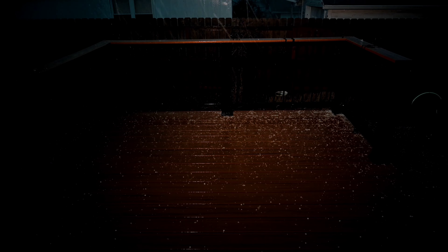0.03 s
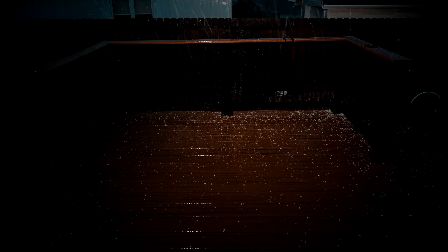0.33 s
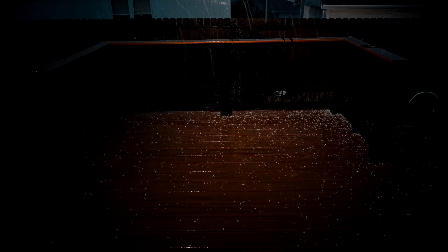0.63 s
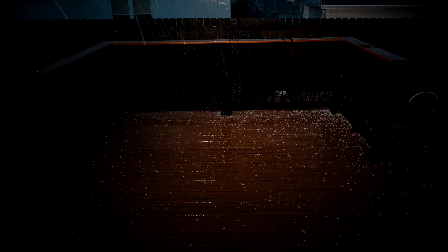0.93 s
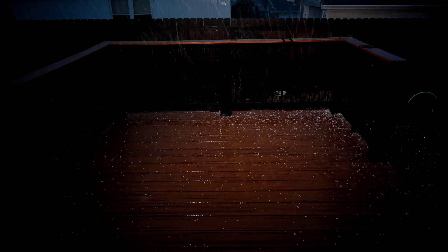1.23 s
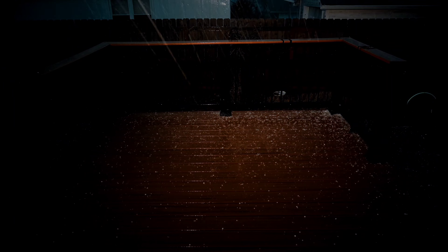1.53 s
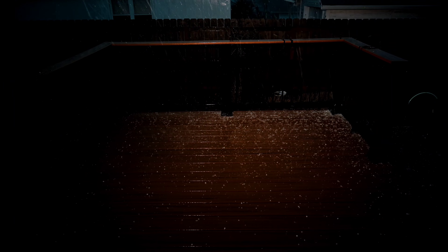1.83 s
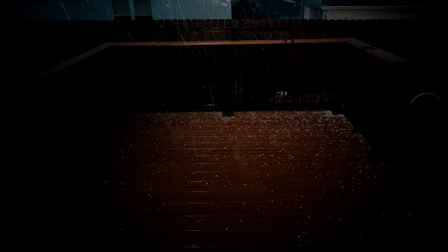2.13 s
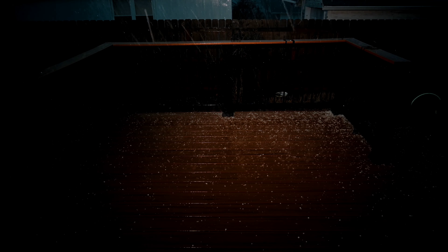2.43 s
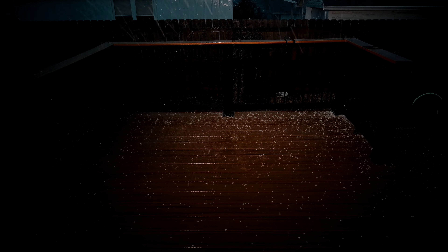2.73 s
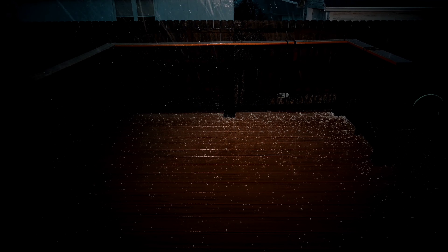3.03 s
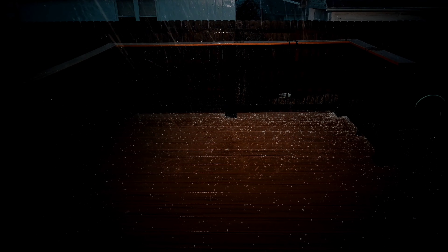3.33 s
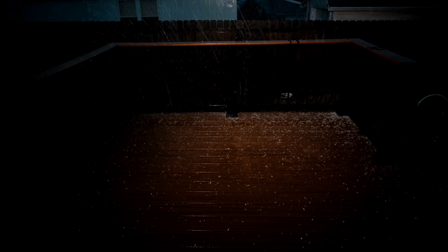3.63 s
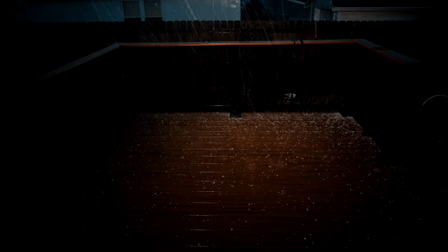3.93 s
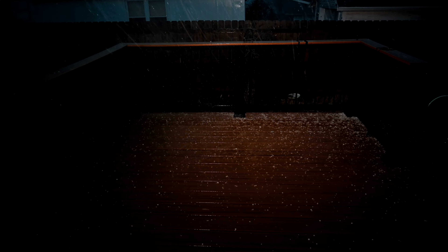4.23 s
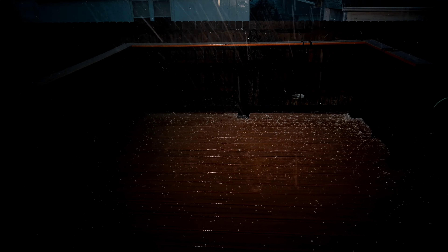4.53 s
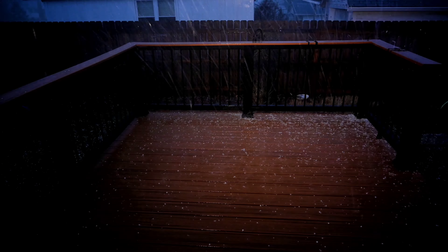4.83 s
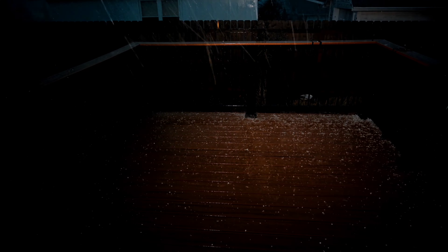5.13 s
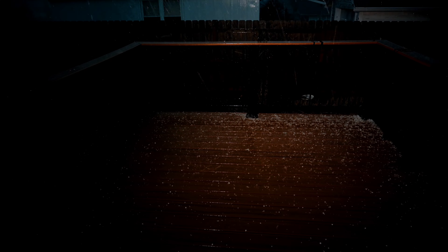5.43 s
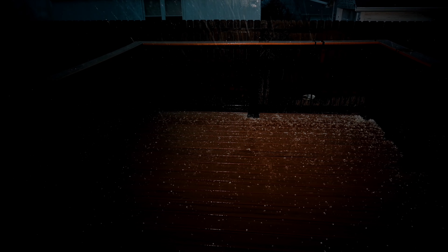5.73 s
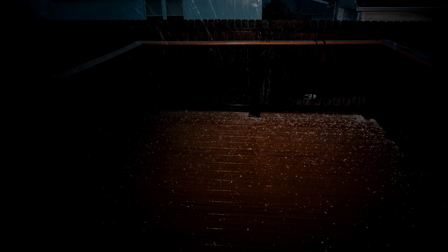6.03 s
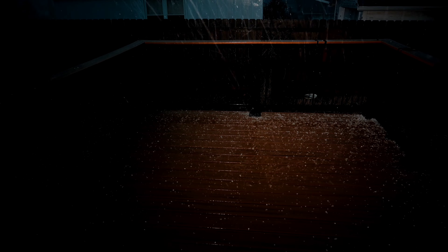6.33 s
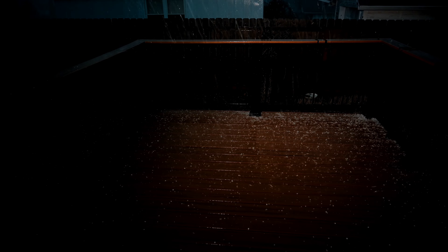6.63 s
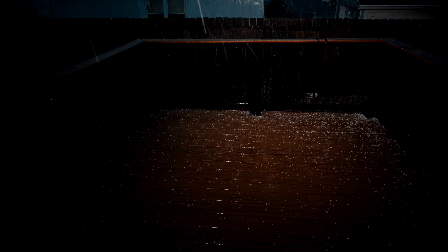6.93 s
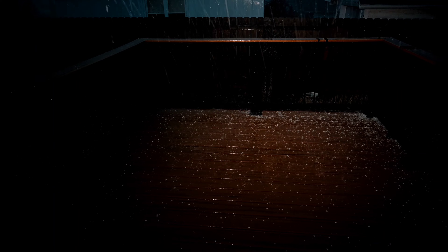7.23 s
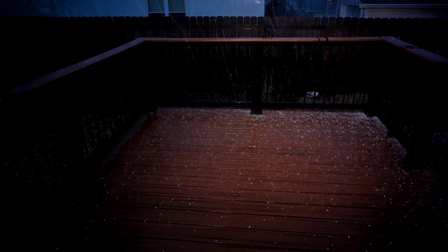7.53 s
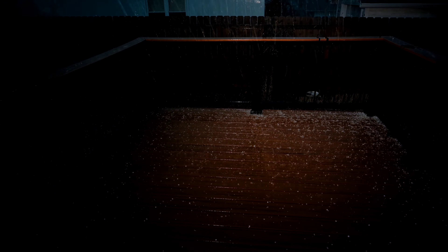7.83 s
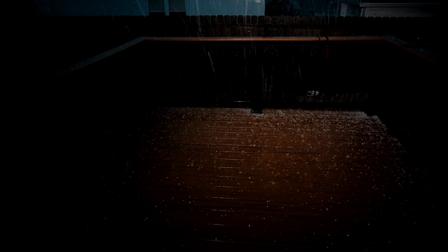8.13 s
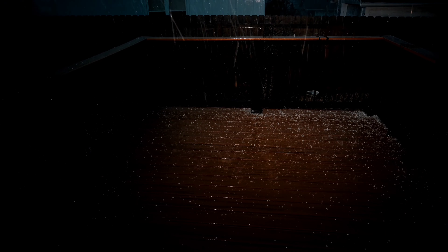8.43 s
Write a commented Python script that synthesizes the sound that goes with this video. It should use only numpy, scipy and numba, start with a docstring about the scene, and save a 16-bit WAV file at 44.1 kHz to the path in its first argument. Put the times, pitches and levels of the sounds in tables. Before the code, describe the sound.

Heavy rain falls steadily on a wooden deck outdoors, heard from shelter. A broad hiss of distant drops lies under close ticking, splashing and pattering on wet boards, with faint pings on metal. Fat drips splat and heavier ones thud softly on the deck. Every so often a hard drop or small hailstone snaps sharply near the microphone, and the shower dips for an instant.

```python
"""Heavy rain on a wooden deck at night, heard from shelter, nearly mono.
Countless far drops make a wash; near drops tick, splash, ring bubbles, drum the boards and ping on metal.
Fat drips splat on wet wood, heavy ones thud on the deck; air faintly bumps the microphone.
Now and then a hard drop or hailstone snaps close by and a limiter ducks the whole shower."""
import sys
import numpy as np
from scipy import signal
from scipy.fft import rfft, irfft, next_fast_len
from scipy.io import wavfile
from scipy.ndimage import uniform_filter1d
from numba import njit

SR = 44100
rng = np.random.default_rng(int(sys.argv[2]) if len(sys.argv) > 2 else 0)


def generate_wav(sig):
    """Save sig (samples, or channels by samples) to the path in sys.argv[1] as 16-bit PCM at SR."""
    pcm = np.round(np.clip(np.atleast_2d(sig).T, -1, 1) * 32767).astype(np.int16)
    wavfile.write(sys.argv[1], SR, pcm)


N = 373527

# Layer gains as the shower varies: time_s, boards_db, spray_db, metal_db, body_db
SHOWER_GAINS = [(0, .5, -1, 0, 0), (.5, 2, -1.5, 1, 4.5), (1.0, -.5, 1, 3, -8), (1.45, 1.5, 1, -6, 5.5),
                (1.7, -3.5, -1, -4, -7), (2.1, -0.5, 0, 6, 1), (2.95, 1.5, -1, -21, 6),
                (3.5, -1.5, -1.5, 0, 4), (3.75, 3.5, 1.7, 0, 5.5), (4.2, -3.5, 0, -5, 3.5),
                (4.7, -2, 0, 7, 1), (5.6, -6, 2.4, -9, -4), (6.2, 0, -0.2, 1, -6.5),
                (6.7, -10, 0.5, 4, -0.5), (7.15, -2.5, -1.5, 2, -10.5), (7.8, -0.5, 0.5, 1, 1.5),
                (8.45, -6, -0.5, 4, -2.5)]
# Rain tone at the microphone: freq_hz, relative_db
RAIN_EQ = [(25, -69), (65, -31.5), (115, -23), (165, -11.5), (270, -5.5), (390, -5), (550, -2.5),
           (850, 0.63), (1250, -0.57), (2250, 0.26), (3200, 0.1), (4550, -0.24), (5150, -5.5), (6800, -4),
           (8050, -2), (9600, -8), (11500, -10.3), (13000, -8), (14400, -15.5)]
# Stereo width: freq_hz, side_minus_mid_db
SIDE_EQ = [(60, -17), (250, -40.5), (1000, -53.5), (3800, -56.5), (5500, -37), (8000, -14.5),
           (14000, -11.5)]
# Wet metal resonances: pitch_hz, relative_db
METAL_MODES = [(4420, -18), (8080, -22)]
# Hard drops close by: peak_s, level_db, pitch_hz
HARD_DROPS = [(0.5628, -3.5, 5000), (0.9636, 0, 3500), (1.1205, 0.5, 4000), (1.2955, 4, 3980),
              (1.582, 5.5, 3250), (1.8454, 1, 4000), (2.2054, 3, 5000), (2.2799, 3.5, 17000),
              (2.446, 3.5, 4500), (2.7636, 5.7, 4340), (3.09, 0.7, 4000), (3.16, -2.5, 17000),
              (3.2669, 2, 12000), (3.854, 2.5, 4000), (3.878, 6.5, 14200), (4.2003, 0.5, 5000),
              (4.413, 0, 7000), (4.9001, 2.3, 7000), (5.294, -3, 6000), (5.6208, -1, 3500),
              (5.7696, -3, 4000), (5.9956, 0, 5000), (6.7464, 6.5, 3200), (7.0602, -3, 4500),
              (7.089, 4, 4000), (7.4452, 0.5, 6000), (7.5829, 6.5, 3800), (7.8152, 4, 4500),
              (8.4359, 7, 4630)]
# Fat drips on wet wood: peak_s, level_db, centre_hz, half_length_s
FAT_DRIPS = [(.452, -25, 9000, .003), (.652, -29, 11500, 0.0034), (.704, -18, 3470, 0.0033),
             (.773, -22, 7000, .003), (1.049, -21, 3800, .003), (2.203, -21, 7500, .003),
             (3.267, -24, 11000, .003), (3.519, -21, 8000, .003), (3.805, -27, 3600, .006),
             (4.745, -24, 8000, .006), (5.09, -19, 3800, .003), (5.433, -19, 3800, .003),
             (5.514, -19, 13100, 0.0037), (5.618, -16, 3680, 0.0044), (5.727, -17, 3760, 0.003),
             (5.765, -19, 3620, 0.0074), (5.854, -21, 3400, 0.0063), (6.485, -20, 3700, 0.0037),
             (6.705, -21, 3780, 0.0028), (6.744, -19, 3500, .003), (7.058, -20, 3700, .003)]
# Heavy drips on the deck: peak_s, level_db, pitch_hz
HEAVY_DRIPS = [(0.211, -41, 119), (0.398, -37.5, 113), (1.487, -36, 106), (2.745, -46, 108),
               (3.07, -41, 109), (3.407, -41, 118), (3.51, -38, 98), (3.658, -40, 114), (3.779, -39, 132),
               (4.149, -40.5, 112), (4.404, -43, 127), (4.604, -49, 117), (5.007, -39, 124),
               (5.135, -42, 120), (5.231, -44, 105), (5.312, -47, 116), (5.442, -43, 128),
               (5.794, -42.5, 121), (6.305, -44, 121), (6.498, -46, 129), (6.665, -44, 82),
               (6.745, -39, 99), (7.543, -44, 130), (7.789, -47, 116), (8.017, -41, 108), (8.284, -37, 105)]
# Air on the microphone: start_s, level_db, pitch_hz
AIR_BUMPS = [(1.895, -45, 52), (2.755, -41, 30), (4.895, -50, 40)]


def rain(boards_db, spray_db, metal_db, body_db):
    """Far and near drops, each layer at its own gain; the treble flickers."""
    far = wash()
    fine = spray()
    boards = drumming() * undb(boards_db)
    body = deck_body() * undb(body_db)
    metal = pings() * undb(metal_db)
    fine *= undb(spray_db + 0.8 * wander(rate_hz=22))
    return equalise(far + fine + boards + metal + body, RAIN_EQ)


def wash():
    """Countless far drops merge into noise."""
    return set_rms(rng.standard_normal(N), 0.2) * undb(0.41 * wander(rate_hz=15))


def spray():
    """Near drops tick, big ones burst into droplets, trapped air rings in the puddles."""
    ticks = drops(per_s=3800, lo_hz=1600, hi_hz=15100, cycles=2.38, spread_db=3.5)
    burst_envelope = np.abs(drops(per_s=100, lo_hz=87, hi_hz=217, cycles=5.5, spread_db=3))
    splashes = bandpass(burst_envelope * rng.standard_normal(N), 3700, 22000)
    bubbles = drops(per_s=700, lo_hz=3500, hi_hz=14500, cycles=190, spread_db=4.4, glide=.02)
    return set_rms(ticks, -0.98) + set_rms(splashes, -6) + set_rms(bubbles, -7)


def drumming():
    """Wet boards and nearby things answer each drop with a short pitched knock."""
    patter = drops(per_s=950, lo_hz=1000, hi_hz=4800, cycles=65, spread_db=3.9)
    wood = drops(per_s=260, lo_hz=427, hi_hz=1103, cycles=55, spread_db=2)
    return set_rms(patter, -8.5) + set_rms(wood, -13)


def deck_body():
    """Drops ring the deck's low body."""
    return set_rms(drops(per_s=110, lo_hz=135, hi_hz=417, cycles=21, spread_db=0.5), -16.5)


def pings():
    """Drops ring wet metal near its resonances."""
    return sum(set_rms(drops(per_s=130, lo_hz=hz * .95, hi_hz=hz * 1.05, cycles=130, spread_db=2.5), db)
               for hz, db in METAL_MODES)


def snaps(decay_cycles=.23):
    """Each hard drop is one sharp pressure swing without bass."""
    out, t = np.zeros(N), np.arange(-64, 65) / SR
    for peak_s, db, hz in HARD_DROPS:
        pulse = np.cos(2 * np.pi * hz * t) * np.exp(-np.abs(t) * hz / decay_cycles)
        first = int(np.clip(peak_s * SR - len(t) // 2, 0, N - len(t)))
        out[first:first + len(t)] -= undb(db) * pulse
    return signal.sosfilt(signal.butter(4, 300, "high", fs=SR, output="sos"), out)


def splats():
    """Each fat drip bursts into a brief, narrow-band hiss of droplets."""
    out, t = np.zeros(N), np.arange(-1024, 1024) / SR
    for peak_s, db, hz, half_length_s in FAT_DRIPS:
        hiss = set_rms(bandpass(rng.standard_normal(len(t)), hz * .8, hz * 1.2), db)
        first = int(peak_s * SR) - len(t) // 2
        out[first:first + len(t)] += hiss * np.exp(-.5 * (t / half_length_s) ** 2)
    return out


def thuds(body_db, soft_per_s=23, soft_db=-47, scatter_db=3, lo_hz=98, hi_hz=170):
    """Heavy drips hit the deck; softer random ones follow the gain of its low body."""
    draws = rng.random((int(soft_per_s * N / SR), 3))
    soft = sum(thud(when * N / SR, soft_db + scatter_db * (2 * size - 1), lo_hz + (hi_hz - lo_hz) * pitch)
               for when, size, pitch in draws)
    return sum(thud(*drip) for drip in HEAVY_DRIPS) + soft * undb(body_db)


def thud(peak_s, db, hz, rise_s=0.0206):
    """The deck swells to one low note and dies within a few cycles."""
    out = np.zeros(N)
    first = max(int((peak_s - rise_s) * SR), 0)
    age_s = np.arange(min(int(5 * rise_s * SR), N - first)) / SR
    envelope = (age_s / rise_s * np.exp(1 - age_s / rise_s)) ** 4
    out[first:first + len(age_s)] = undb(db) * envelope * np.sin(2 * np.pi * hz * age_s)
    return out


def air_bumps(cycles=3.):
    """Soft, very low pushes of air."""
    start_s, db, hz = np.array(AIR_BUMPS, float).T.copy()
    return damped_sines(start_s, hz, np.full(len(hz), cycles), undb(db), 0.)


def drops(per_s, lo_hz, hi_hz, cycles, spread_db, glide=0.):
    """Randomly timed ringing drops, most small, a few large; rms 1."""
    when, pitch, length, size, sign = rng.random((int(per_s * N / SR), 5)).T
    hz = np.minimum(lo_hz + (hi_hz - lo_hz) * pitch, SR * .45)
    bigness = -np.log(size + np.exp(-3.4))  # capped: no random drop ducks the shower deeply
    gain = undb(spread_db * bigness) * np.sign(sign - .5)
    gain *= np.sqrt(hz)  # short high grains peak higher for equal energy
    return set_rms(damped_sines(when * N / SR, hz, cycles * (.5 + length), gain, glide), 0)


@njit
def damped_sines(start_s, hz, cycles, gain, glide):
    """Sum of sines, each fading 50 dB over its cycles while its pitch rises by the fraction glide."""
    out = np.zeros(N)
    for k in range(len(start_s)):
        length = int(cycles[k] * SR / hz[k]) + 2
        step_rad = 2 * np.pi * hz[k] / SR
        phasor = gain[k] + 0j
        pole = np.exp(1j * step_rad - 5.76 / length)
        bend = np.exp(1j * step_rad * glide / length)
        first = max(int(start_s[k] * SR), 0)
        for i in range(first, min(first + length, N)):
            out[i] += phasor.imag
            phasor *= pole
            pole *= bend
    return out


def wander(rate_hz):
    """Ramps between random values; rms 1."""
    hold = max(int(SR / rate_hz), 2)
    steps = np.repeat(rng.standard_normal(N // hold + 2), hold)[rng.integers(hold):]
    return set_rms(uniform_filter1d(steps, hold)[:N], 0)


def equalise(x, points):
    """Minimum-phase filter through (freq_hz, gain_db) points."""
    hz, db = np.transpose(points)
    size = next_fast_len(N + 8192, real=True) * 2
    bin_hz = np.maximum(np.arange(size // 2 + 1) * SR / size, 1)
    gain = undb(np.interp(np.log(bin_hz), np.log(hz), db))
    cepstrum = irfft(np.log(gain))
    cepstrum[1:size // 2] *= 2
    cepstrum[size // 2 + 1:] = 0
    return irfft(rfft(x, size) * np.exp(rfft(cepstrum)))[:N]


def bandpass(x, lo_hz, hi_hz):
    """Gentle band-pass."""
    return signal.sosfilt(signal.butter(2, [lo_hz, hi_hz], "band", fs=SR, output="sos"), x)


def set_rms(x, db):
    """Scale to an rms level."""
    return x * undb(db) / np.sqrt(np.mean(x ** 2))


def undb(db):
    """Decibels to gain."""
    return 10 ** (np.asarray(db) / 20)


def limiter(x, threshold_db=-7, ratio=3, hold_s=0.057, release_db_per_s=70, settle_s=0.029,
            late_share=0.26, start_db=2.5):
    """Peaks pull the gain down, mostly at once, the rest a moment later."""
    mid_db = 20 * np.log10(np.abs(x.mean(axis=0)) + 1e-9)
    cut_db = (mid_db - threshold_db) * (1 - 1 / ratio)
    fast_db = peak_hold(cut_db, hold_s * SR, release_db_per_s / SR, start_db)
    step = 1 / (settle_s * SR)
    slow_db = signal.lfilter([step], [1, step - 1], fast_db)
    return x * undb(-fast_db - late_share * (slow_db - fast_db))


@njit
def peak_hold(cut_db, hold_samples, fall_db_per_sample, start_db):
    """Gain reduction jumps to each new peak, holds, then falls steadily."""
    out, held_db, wait = np.empty(len(cut_db)), start_db, hold_samples
    for i in range(len(out)):
        wait -= 1
        if cut_db[i] > held_db:
            held_db, wait = cut_db[i], hold_samples
        elif wait < 0:
            held_db = max(held_db - fall_db_per_sample, 0.)
        out[i] = held_db
    return out


def scene(rain_db=-19.5):
    """Shower and drips in the middle, the rain's treble slightly spread."""
    time_s, *columns = np.transpose(SHOWER_GAINS)
    boards_db, spray_db, metal_db, body_db = (np.interp(np.arange(N) / SR, time_s, db) for db in columns)
    mid, side = (set_rms(rain(boards_db, spray_db, metal_db, body_db), rain_db) for _ in range(2))
    centre = mid + snaps() + splats() + thuds(body_db) + air_bumps()
    return centre + equalise(side, SIDE_EQ) * np.array([[1], [-1]])


def record(dry):
    """The limiter ducks after each snap; steep low-pass at 14.5 kHz."""
    return signal.sosfilt(signal.ellip(10, .2, 80, 14500, fs=SR, output="sos"), limiter(dry))


dry = scene()
out = record(dry)
generate_wav(out)
```